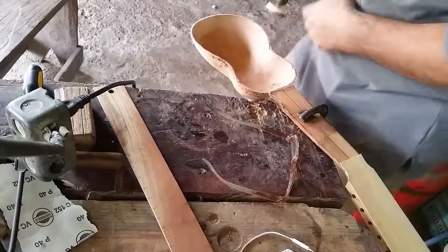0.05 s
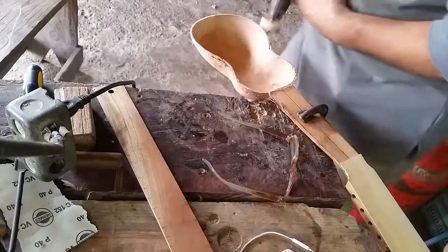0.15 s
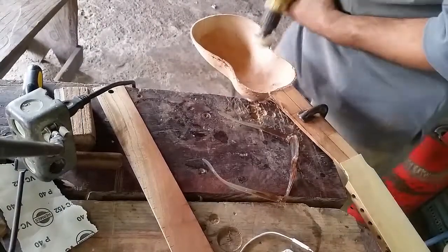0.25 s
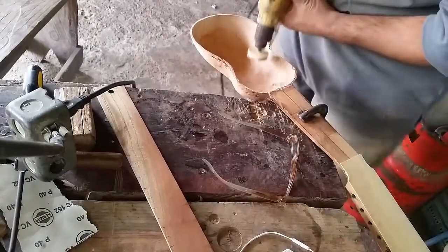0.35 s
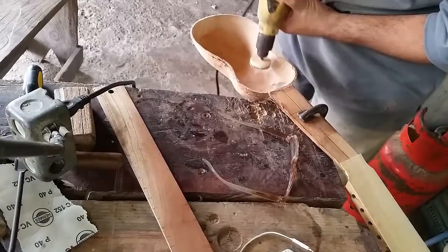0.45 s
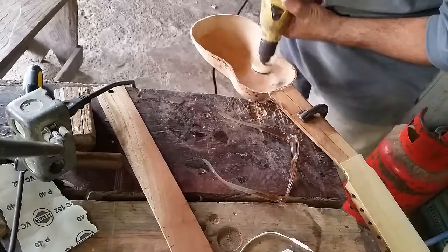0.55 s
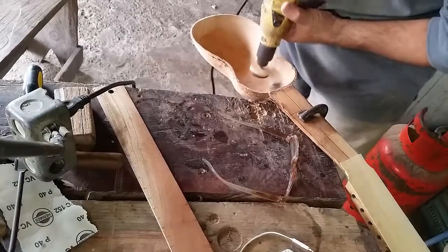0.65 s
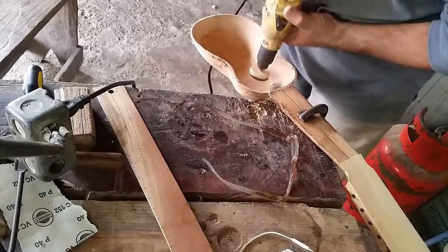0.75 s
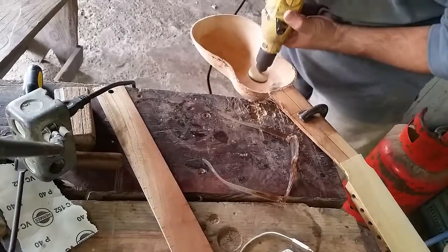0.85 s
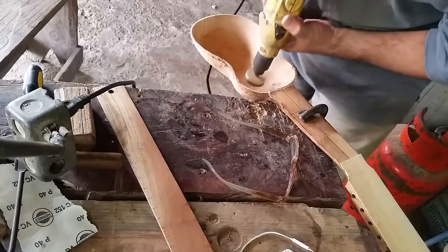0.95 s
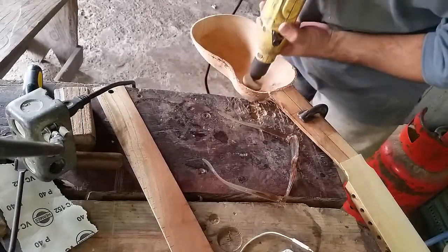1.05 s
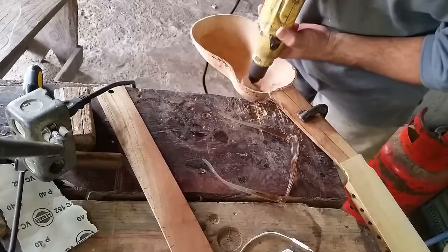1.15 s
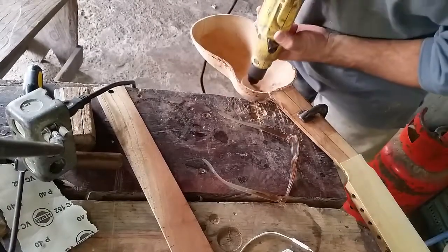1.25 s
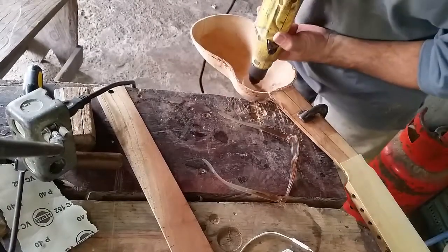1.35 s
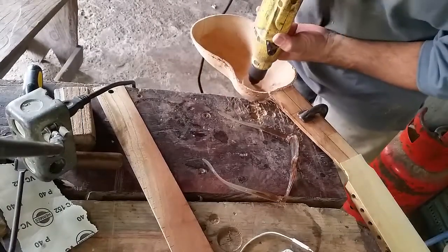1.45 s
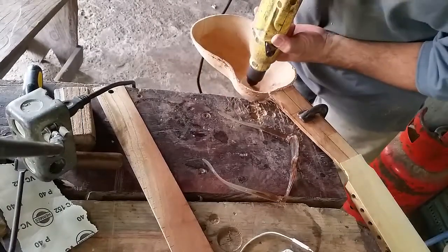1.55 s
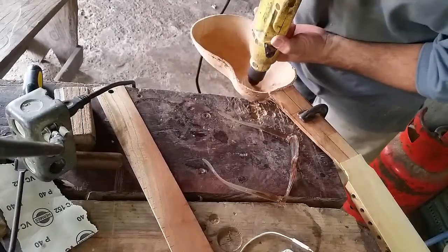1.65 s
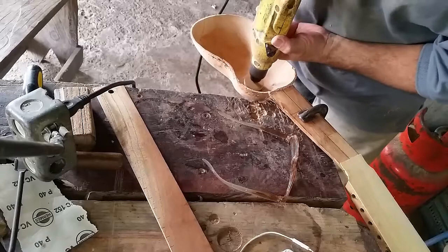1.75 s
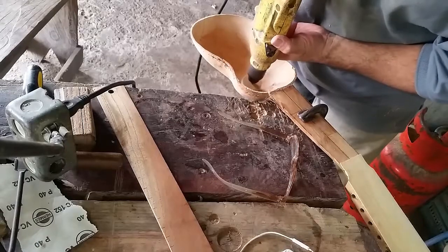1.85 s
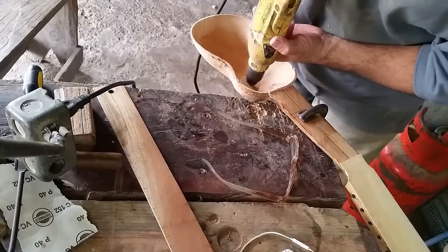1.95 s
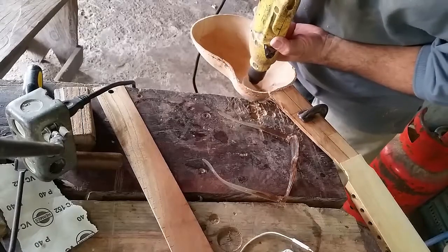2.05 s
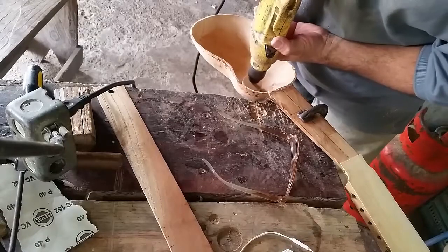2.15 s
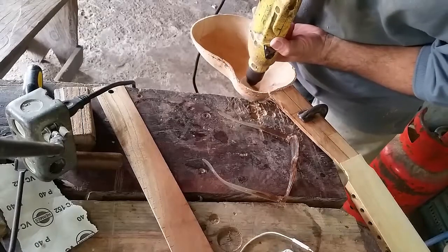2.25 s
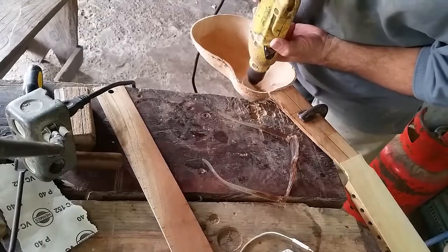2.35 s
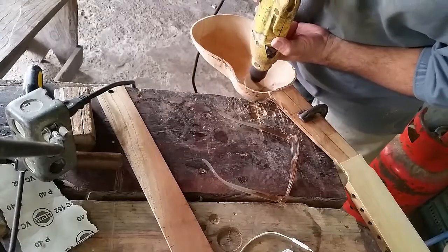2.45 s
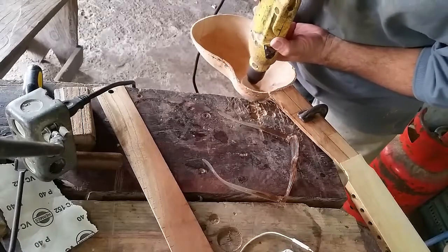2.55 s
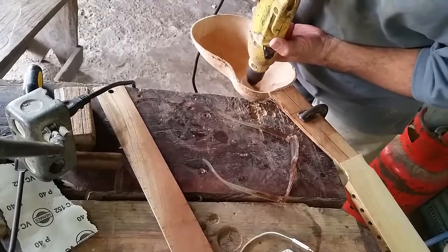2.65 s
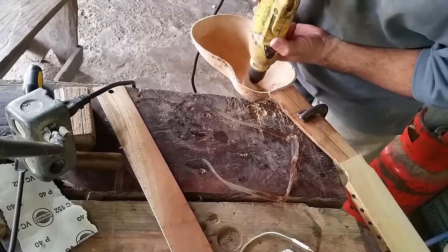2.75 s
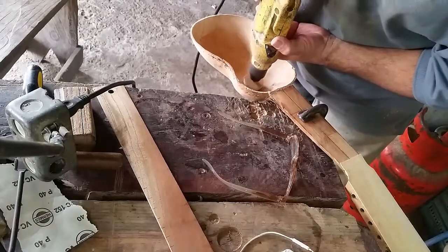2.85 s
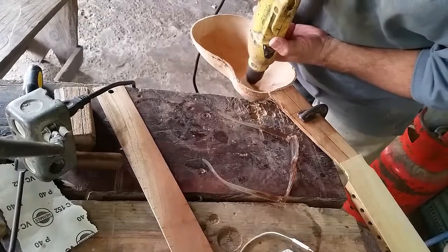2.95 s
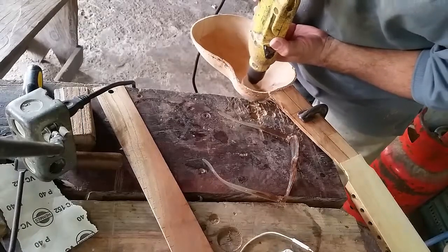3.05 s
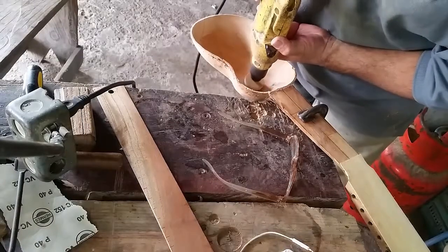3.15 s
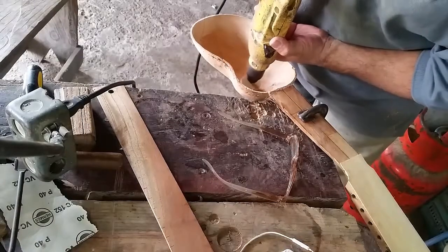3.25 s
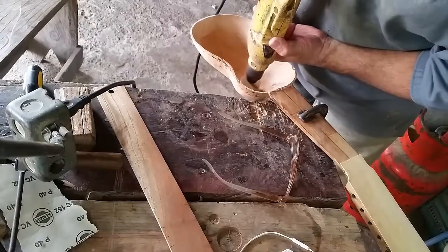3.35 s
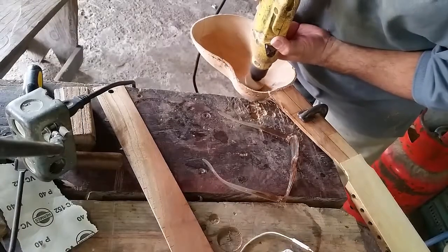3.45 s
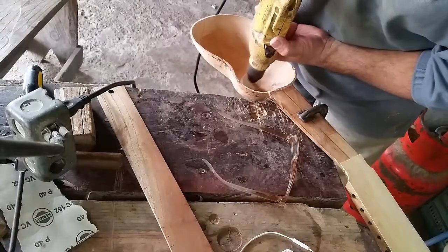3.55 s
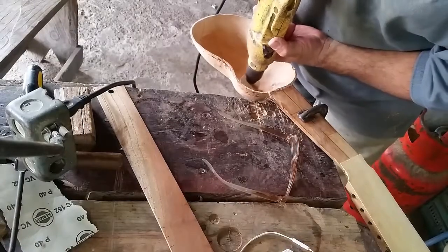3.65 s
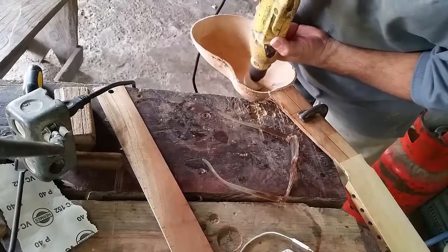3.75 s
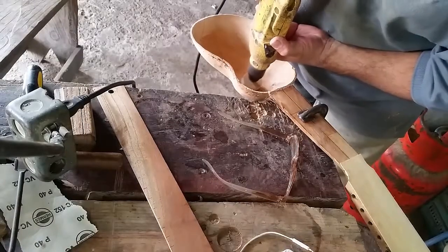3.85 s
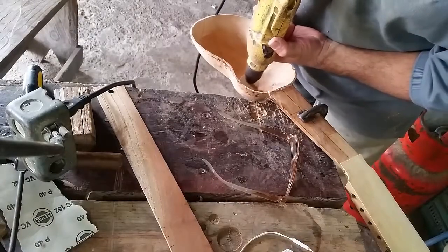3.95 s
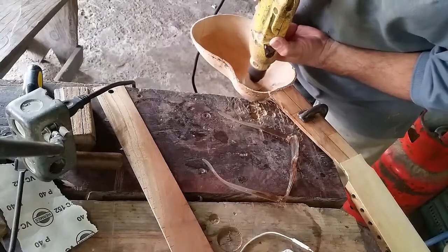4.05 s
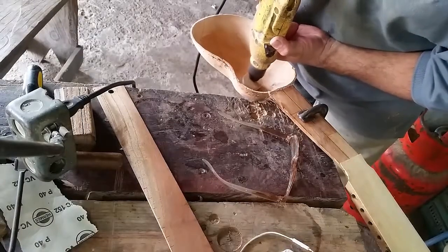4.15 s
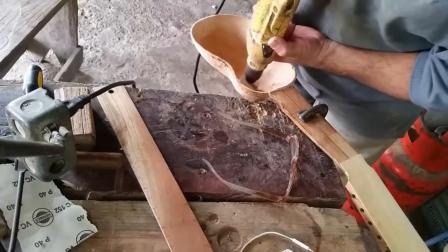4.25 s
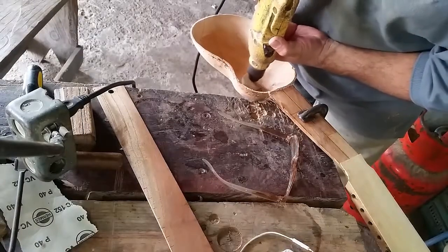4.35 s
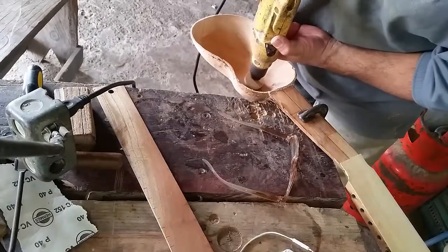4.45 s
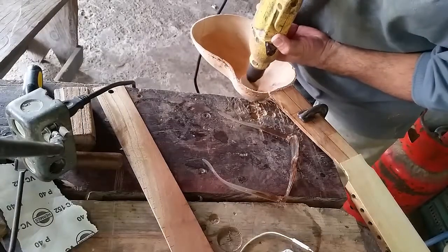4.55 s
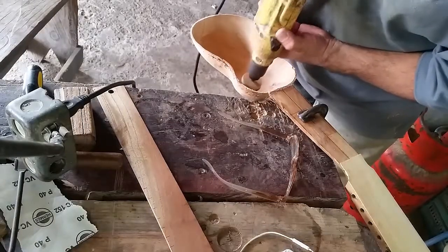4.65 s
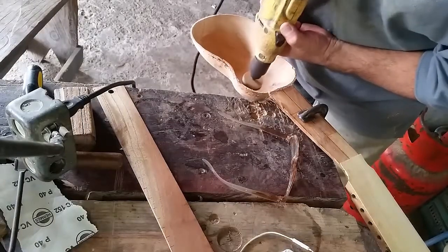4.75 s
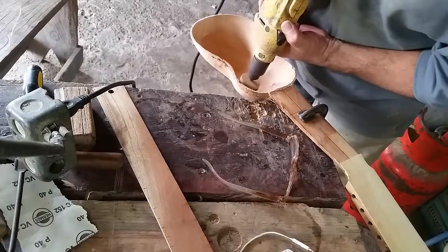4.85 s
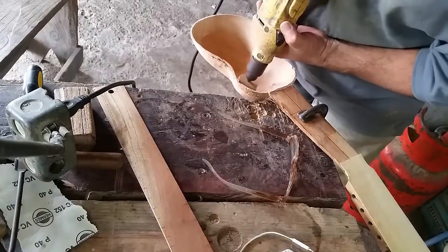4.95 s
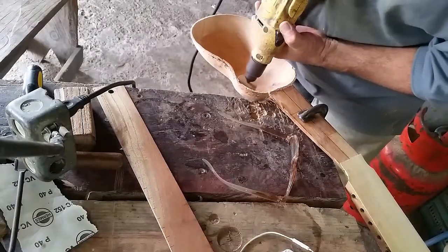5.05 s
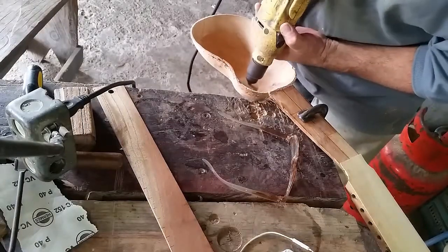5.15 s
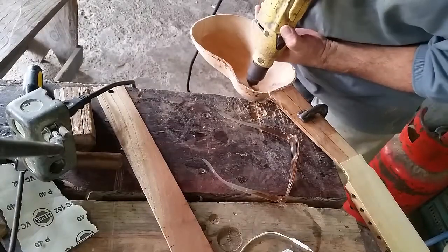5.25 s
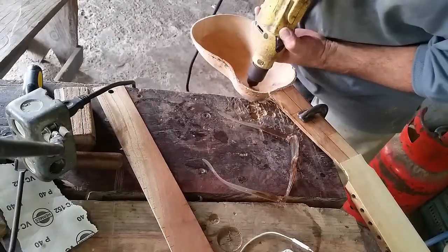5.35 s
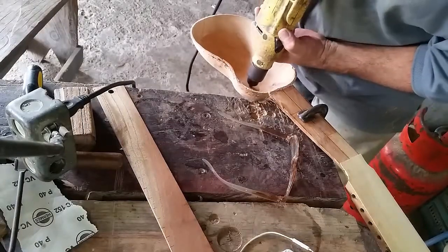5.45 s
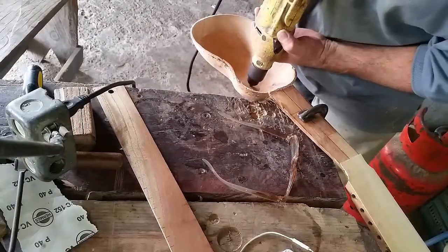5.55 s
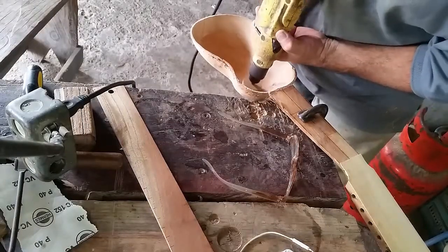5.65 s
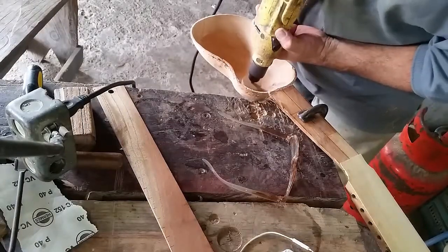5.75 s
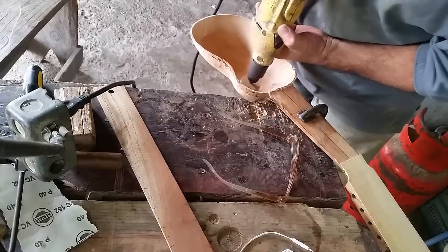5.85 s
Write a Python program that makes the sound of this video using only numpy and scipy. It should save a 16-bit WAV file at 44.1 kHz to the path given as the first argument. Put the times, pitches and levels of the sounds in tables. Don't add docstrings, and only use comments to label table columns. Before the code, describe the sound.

After a quiet outdoor hush, a power drill knocks, spins up and whines high, sanding a hollow wooden body with rushing, hissing noise.

```python
import sys
import numpy as np
from scipy import signal
from scipy.fft import rfft, irfft
from scipy.io import wavfile
from scipy.ndimage import uniform_filter1d

SR = 44100
rng = np.random.default_rng(int(sys.argv[2]) if len(sys.argv) > 2 else 0)


def makeup_ratio(level_db):
    decades = np.asarray(level_db, float) / 20
    return 10 ** decades


def file_out(sig):
    cols = np.atleast_2d(sig).T
    lim = np.clip(cols, -1, 1)
    pcm = np.round(lim * 32767).astype(np.int16)
    wavfile.write(sys.argv[1], SR, pcm)


N = 259749
T = np.arange(N) / SR
TOP_HZ = 6442


# time_s, whistle_sag_hz
LOAD_SAG = [(.68, 0), (.705, -39), (.76, 82), (.835, -55), (1.02, 27), (1.35, -5), (3.7, 5), (3.9, 38),
            (4.1, 34), (4.5, 62), (4.7, 17), (5.0, -35), (5.2, -54), (5.4, -34), (5.6, 5), (5.75, 18),
            (5.89, 11)]


def whistle_hz():
    start_s, quick_share, quick_s, slow_s = .6407, .5225, .1136, .4638
    u = np.maximum(T[::32] - start_s, .012)
    missing = quick_share * np.exp(-u / quick_s) + (1 - quick_share) * np.exp(-u / slow_s)
    return np.interp(T, T[::32], TOP_HZ * (1 - missing)) - curve(LOAD_SAG)


def speed_db():
    return 20 * np.log10(whistle_hz() / TOP_HZ)


def shaft_turns():
    return np.cumsum(whistle_hz()) / SR / 13


# tone_hz, level_db
VENT_LEVELS = [
    [(1200, -60.5), (1900, -42), (2200, -27.5), (2800, -35.5), (3300, -57), (3900, -29), (4650, -30.5), (5200, -34), (6400, -36.5)],
    [(6600, -61), (8200, -60), (9700, -49), (11000, -53), (12000, -46), (12400, -45), (12800, -41)],
]
# middle_s, length_s, tone_db, octave_db
WRIST_TILTS = [(1.132, 0.036, -6, -7), (1.69, 0.084, -5, 2), (1.81, 0.033, 1, -5), (2.06, 0.12, -5, -3),
               (2.4, 0.12, -3, -1), (2.55, .15, -1.5, 2), (2.76, 0.14, -5, 0), (3.1, 0.45, 0, 0.5),
               (3.85, 0.39, -0.5, 0), (4.35, 0.67, 1, -3.5), (4.72, .12, -2, 8), (5.1, 0.9, -1.5, -2),
               (5.35, 0.47, -3, -1), (4.87, 0.17, -0.5, 1.5), (5.55, .07, -6, -2), (5.79, 0.12, -18, -6)]


def blade_whistle():
    turns = shaft_turns()
    tone = np.zeros(N)
    for k in (1, 2):
        vent_db = np.interp(k * whistle_hz(), *np.transpose(VENT_LEVELS[k - 1]))
        level_db = vent_db + bumps(WRIST_TILTS, column=k + 1) + 2.02 * drift(45.)
        tone += makeup_ratio(level_db) * np.cos(2 * np.pi * k * 13 * turns + 0.65 * drift(60.))
    echo = np.clip(3 - 4.4 * whistle_hz() / 6420, .15, .9)
    echo_delay_s = .00644
    return (tone + echo * np.roll(tone, round(echo_delay_s * SR))) / np.sqrt(1 + echo ** 2)


# shaft_multiple, level_db, waver_db, fuzz_hz, growth (as a power of speed)
SHAFT_TONES = [
    (1, -55, 2, 10, 12),
    (2, -47, 2, 14, 35),
    (3, -50, 2.5, 20, 8),
    (4, -47, 3, 30, 12),
    (5, -53, 3, 30, 12),
    (12, -56.5, 3, 20, 0),
    (18.12, -52, 3, 70, 7),
    (20.86, -57, 3, 90, 2),
    (24, -60.5, 3, 25, 0),
]


def shaft_tones():
    turns, speed = shaft_turns(), whistle_hz() / 6420
    tones = np.zeros(N)
    for multiple, db, waver_db, fuzz_hz, growth in SHAFT_TONES:
        wander = np.cumsum(fuzz_hz * .3 * drift(120.)) / SR
        level = speed ** growth * makeup_ratio(db + waver_db * drift(30.))
        tones += level * np.cos(2 * np.pi * (multiple * turns + wander))
    return colour(tones, [(4200, 0), (4700, 19), (5200, 0)])


def whistles():
    return np.sqrt(2) * (blade_whistle() + shaft_tones())


# pitch_hz, level_db (per Hz)
ROAR_COLOUR = [(350, -27), (600, -11.5), (979, -12), (1830, -1), (2190, 1), (3400, -0.65), (4260, -3),
               (5980, -9.5), (6490, -18.5), (6760, -15), (8400, -27.5), (13200, -22), (14700, -19.5),
               (15500, -35)]
# pitch_hz, level_db (per Hz)
RUMBLE_COLOUR = [(60, -19), (130, -19), (200, -13), (280, 6), (450, 6.5), (700, 4), (1000, 8.5),
                 (1500, -49)]
# pitch_hz, width_hz, level_db
CASING_RINGS = [(820, 120, -5), (930, 60, -5), (1065, 70, 2), (1220, 80, -2), (1540, 200, -5)]
# pitch_hz, width_hz, level_db
BOWL_RINGS = [(2300, 250, -5), (2750, 160, -3), (3280, 200, 0), (4250, 260, -1), (4600, 200, -5)]
# time_s, casing_ring_share, open_bowl_share
HOLD = [(.65, .8, 0), (.7, .4, 0), (.76, .5, 0), (.8, .75, .25), (.95, .75, .45), (1.17, .65, .45),
        (1.35, .55, .3), (1.8, .2, .15), (2.2, .15, .15), (4.55, .12, .15), (4.75, .2, .55),
        (5.25, .2, .55), (5.4, .15, .3), (5.89, .15, .25)]
# time_s, roar_db
LEAN = [(1.4, -0.3), (1.8, 0.8), (2.1, 1.5), (2.2, -0.1), (3.7, 0), (3.85, 0.9), (5.15, -0.3), (5.5, 0.8)]
# middle_s, length_s, rumble_db
BOWL_JOLTS = [
    (.73, .04, 2),
    (1.17, .05, 6),
    (2.14, 0.065, 4),
    (4.1, 0.12, 1.5),
    (5.58, .06, 6),
    (5.74, 0.068, 6),
]
# middle_s, length_s, hiss_db
PAD_PRESSES = [(1.36, .04, -2), (1.42, 0.068, 3.5), (1.6, 0.071, -0.5), (1.76, 0.22, 4.5), (1.98, .1, -0.5),
               (2.12, 0.17, 3), (2.45, 0.19, 4), (2.66, 0.081, -3), (2.82, .14, 1.5), (2.97, 0.078, -1),
               (3.08, .12, 0), (3.3, .08, 0), (3.4, 0.049, 1.5), (3.9, 0.36, 0), (4.43, .2, 2),
               (4.61, 0.09, -1), (4.73, 0.055, 0), (5.55, 0.27, 2.5), (5.85, .1, -2)]


def roar():
    teeth = np.cumsum(whistle_hz() * 0.044 * (1 + 0.33 * drift(46.0))) / SR
    chatter = np.clip(1.05 - whistle_hz() / 6900.0, .06, .9)
    tooth_clicks = np.exp(-(teeth % 1) / 0.77)
    drive = patchy(1.22) * (1 - chatter + 1.73 * chatter * tooth_clicks)
    body = evened(colour(drive, ROAR_COLOUR))
    body += curve(HOLD) * ring(drive, CASING_RINGS)
    body += curve(HOLD, column=2) * ring(drive, BOWL_RINGS)
    rumble = evened(colour(patchy(1.9), RUMBLE_COLOUR))
    roar_db = -36 + 0.47 * speed_db() + 0.21 * bumps(PAD_PRESSES) + curve(LEAN)
    rumble_db = -53 + .4 * speed_db() + 0.15 * bumps(PAD_PRESSES) + bumps(BOWL_JOLTS)
    return makeup_ratio(roar_db + 4.0) * body + makeup_ratio(rumble_db + 5.5) * rumble


# pitch_hz, level_db (per Hz)
GRIT_COLOUR = [(2500, -54), (4500, 9), (7000, 4), (10000, 3.5), (13000, 5.5), (14300, 2.5), (14800, -7),
               (15800, -14)]


def grit():
    pad_turns_hz, scratches_per_s = 43.1, 9000.
    beat = 1 + 0.071 * np.cos(2 * np.pi * np.cumsum(pad_turns_hz * whistle_hz() / TOP_HZ) / SR)
    strength = makeup_ratio(2.1 * rng.exponential(1, N))
    scratches = strength * (rng.random(N) < scratches_per_s / SR) * rng.choice([-1, 1], N)
    hiss = evened(scratches) * 0.52 + patchy(1.5)
    level_db = -50.5 + 1.8 * speed_db() + bumps(PAD_PRESSES) + 12.0 + 0.57 * drift(30.)
    return makeup_ratio(level_db) * beat * evened(colour(hiss, GRIT_COLOUR))


# start_s, peak_db, pitch_hz
KNOCKS = [
    (.654, -29, 1100),
    (.6555, -22, 820),
    (.6735, -26, 1050),
    (.682, -28, 950),
    (.6905, -29, 800),
]


def knocks():
    out, t = np.zeros(N), np.arange(800) / SR
    for start_s, db, hz in KNOCKS:
        tone = np.sin(2 * np.pi * hz * t) + .8 * np.sin(2 * np.pi * 2.6 * hz * t)
        crack = signal.lfilter(*signal.butter(3, 4300, fs=SR), rng.standard_normal(len(t)))
        fade = makeup_ratio(db - 60 * t / .026) * np.minimum(t / .0004, 1)
        out[round(start_s * SR):][:len(t)] += fade * (tone + 1.5 * crack)
    return out


def running():
    return np.clip((T - .653) / .003, 0, 1)


RUSH_DB, DUCK_DB = -53.8, -13


def rush_db():
    duck_start_s, duck_s = .85, .45
    return RUSH_DB + DUCK_DB * (1 - np.exp(-np.maximum(T - duck_start_s, 0) / duck_s))


# pitch_hz, level_db (per Hz)
MUFFLED_COLOUR = [(30, -11.1), (90, -3.9), (250, -7.7), (400, -1.6), (550, 0.0), (750, -5.2), (1000, -10.6),
                  (1500, -17.3), (2200, -22.1), (4200, -27.5), (5200, -29.5), (8000, -41.9), (12000, -46.4),
                  (14500, -60.7)]
# pitch_hz, level_db
LEAK_COLOUR = [(1500, -60), (3000, -58), (4200, -56), (5000, -45), (5800, -41), (8000, -39), (12000, -38),
               (13500, -38), (14400, -39), (14900, -60)]
# middle_s, level_db (over the rush)
THUMPS = [(.115, 4), (.307, 3.5), (.526, 2), (.565, 6.5), (.63, 6.5), (.693, 2), (.793, 1.5), (.847, 4.5),
          (.912, 2.5), (1.042, 1.5), (1.12, .5), (1.31, 3), (1.468, 3.5), (1.667, 5.5), (1.725, 5.5),
          (1.933, 6.5), (2.078, 3.5), (2.405, 4.5), (2.967, 3.5), (3.949, 5.5), (4.714, 3.5), (5.318, 5.5),
          (5.529, 4), (5.595, 6)]


def blocked(drill):
    rush = evened(colour(colour(patchy(1.2), MUFFLED_COLOUR), [(150, -16), (330, 0)]))
    narrow = (rush_db() - RUSH_DB) / DUCK_DB
    rush += narrow * (colour(rush, [(280, -9), (420, 1.5), (800, 1.5), (1700, -8)]) - rush)
    thumps, t = np.zeros(N), np.arange(-600, 601) / SR
    faint = rng.random((42, 2)) * [T[-1] - 1.3, -8] + [1.2, 3]
    thump = np.cos(2 * np.pi * 105. * t) * np.exp(-(t / .005) ** 2)
    for middle_s, db in [*THUMPS, *faint]:
        thumps[round(middle_s * SR) - 600:][:len(t)] += makeup_ratio(db + 1.5) * thump
    unsteady = makeup_ratio(.3 + 1.5 * drift(2.) + drift(40.))
    return makeup_ratio(rush_db()) * (unsteady * rush + thumps) + colour(drill, LEAK_COLOUR)


# pitch_hz, level_db (per Hz)
YARD_COLOUR = [(20, -18), (50, -14.5), (66, 0.5), (110, -10), (260, -9), (300, -15.5), (600, -14.5),
               (1500, -17.5), (3000, -24.5), (4400, -29), (5800, -41), (8000, -49.5), (11000, -51.5),
               (15000, -61)]
# pitch_hz, level_db
FAR_ENGINE = [(85, -47), (128, -59), (170, -51), (213, -61), (254, -54.5), (386, -60), (427, -63),
              (662, -60)]
# time_s, level_db
BASS_CUT = [(0, -1), (.35, 1), (.45, -2), (.65, -3), (.85, -6), (.97, -11), (1.1, -26), (1.4, -44),
            (5.89, -48)]


def yard():
    wash = evened(colour(patchy(0.6), YARD_COLOUR))
    low = colour(wash, [(180, -0.5), (330, -33)])
    engine = np.zeros(N)
    for hz, db in FAR_ENGINE:
        level = makeup_ratio(db + 7.0 + 2.7 * drift(18.36))
        engine += level * np.cos(2 * np.pi * hz * T + 1.62 * drift(10.))
    cut = makeup_ratio(curve(BASS_CUT))
    high = makeup_ratio(rush_db() - RUSH_DB) * (wash - low)
    return makeup_ratio(-48.5 + 8.5) * (cut * low + high) + cut * engine


def evened(x):
    return x / np.sqrt(np.mean(x ** 2) + 1e-20)


def curve(rows, column=1):
    rows = np.array(rows)
    return np.interp(T, rows[:, 0], rows[:, column])


def bumps(rows, column=2):
    rows = np.array(rows)[:, :, None]
    middle_s, length_s = rows[:, 0], rows[:, 1]
    swells = np.exp(-((T[::64] - middle_s) / (length_s / 2)) ** 4)
    return np.interp(T, T[::64], (rows[:, column] * swells).sum(0))


def colour(x, points):
    hz, db = np.transpose(points)
    gain_db = np.interp(np.log(np.fft.rfftfreq(N, 1 / SR) + 1), np.log(hz), db)
    return irfft(rfft(x) * makeup_ratio(gain_db), N)


def ring(x, modes):
    f = np.fft.rfftfreq(N, 1 / SR)
    gain = sum(makeup_ratio(db) / (1 + (2 * (f - hz) / width) ** 2) for hz, width, db in modes)
    return evened(irfft(rfft(x) * gain, N))


def drift(rate_hz):
    f = np.geomspace(rate_hz / 20, rate_hz, 16)[:, None]
    waves = np.sin(2 * np.pi * (f * T[::64] + rng.random(f.shape))) / np.sqrt(f)
    return np.interp(T, T[::64], evened(waves.sum(0)))


def patchy(patchy_db):
    a, b, patches = rng.standard_normal((N // 128 + 5, 257, 3)).T
    patches = uniform_filter1d(patches, size=7, axis=0)
    patches = evened(uniform_filter1d(patches, size=12, axis=1))
    noise = (a + 1j * b) * makeup_ratio(patchy_db * patches)
    return evened(signal.istft(noise, nperseg=512, noverlap=384)[1][:N])


def gate(x, points, mask_db):
    sine = np.sin(np.pi * (np.arange(2048) + .5) / 2048)
    hz, t, z = signal.stft(x, SR, window=sine, nperseg=2048, noverlap=1024)
    bands, centre_hz = z[:1024].reshape(64, 16, -1), hz[8:1024:16]
    power = (abs(bands) ** 2).mean(1) / 13 + 1e-20
    near_db = 10 * np.log10(uniform_filter1d(power, size=5, axis=0) + 1e-20) + mask_db
    near_db -= 50 * (centre_hz[:, None] < 3000)
    edge_db = np.maximum(np.interp(centre_hz, *np.transpose(points))[:, None], near_db)
    kept = 10 * np.log10(power) > edge_db + 2.5 * rng.standard_normal(power.shape)
    z[:1024] = (bands * kept[:, None]).reshape(1024, -1)
    return signal.istft(z, SR, window=sine, nperseg=2048, noverlap=1024)[1][:N]


def scene():
    tones = whistles()
    drill = running() * (tones + roar() + grit()) + knocks()
    leak = running() * (.6 * np.roll(tones, -30) + roar() + grit())
    return np.array([drill + yard(), blocked(leak)])


def roll_off(x):
    return signal.sosfilt(signal.butter(12, 15880, fs=SR, output="sos"), x)


# pitch_hz, level_db (per Hz)
GATES = [
    [(3000, -125), (9000, -114), (11500, -112), (13000, -113), (14400, -104), (14650, -88), (15000, -91.5), (15600, -91.5), (15750, 0)],
    [(2000, -126), (4000, -124), (9000, -123), (14400, -121), (14700, -105)],
]
# left_db, right_db
NEIGHBOUR_LIMITS = (-40, -3)


def record(dry):
    gated = np.array([gate(*row) for row in zip(dry, GATES, NEIGHBOUR_LIMITS)])
    return roll_off(gated)


dry = scene()
out = record(dry)
file_out(out)
```